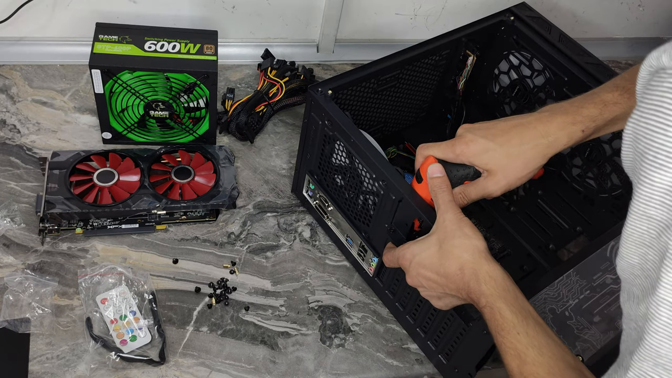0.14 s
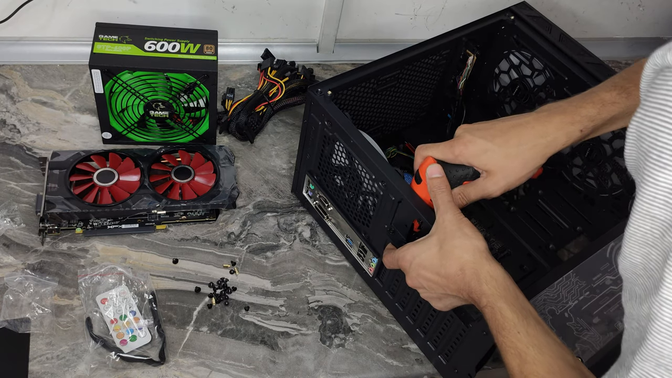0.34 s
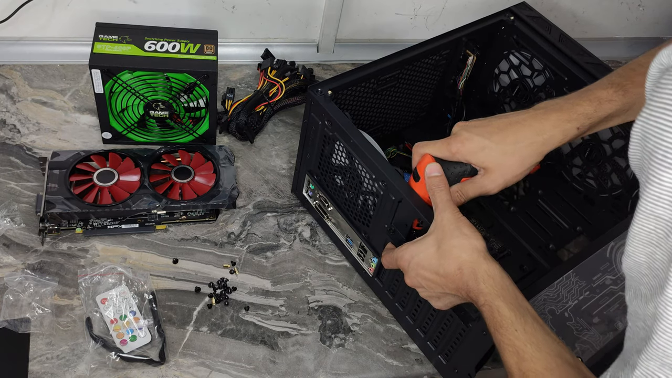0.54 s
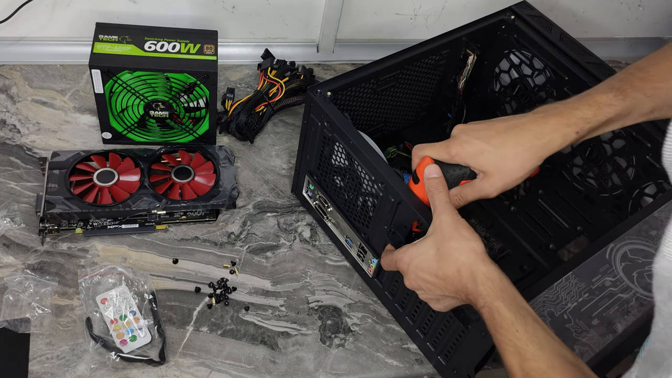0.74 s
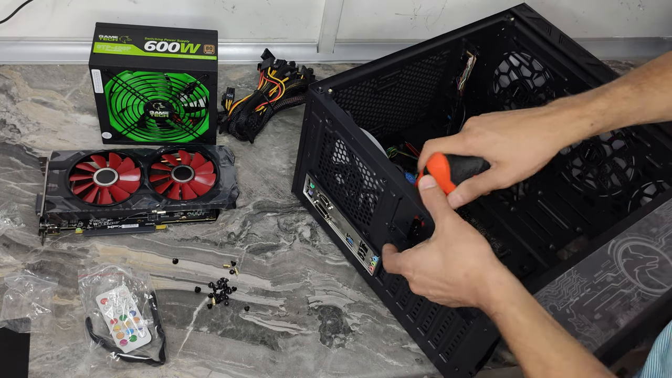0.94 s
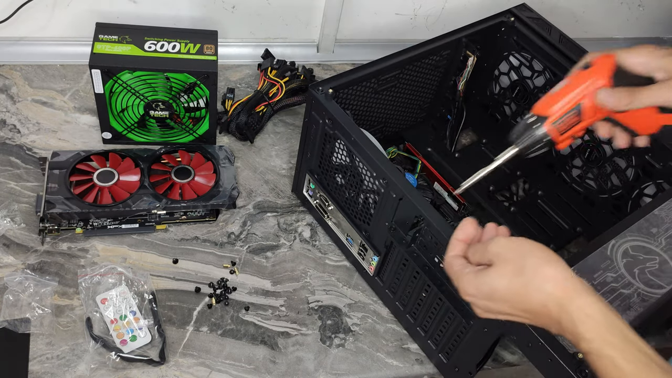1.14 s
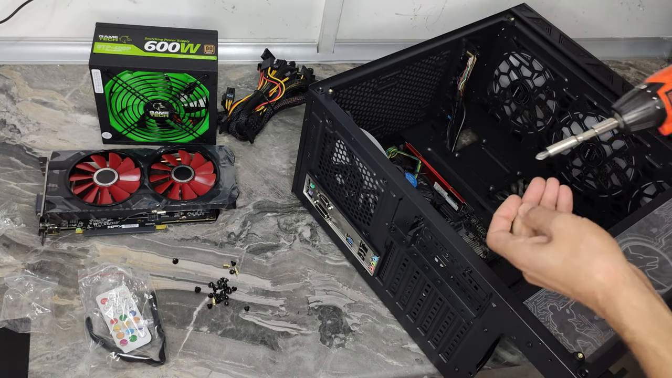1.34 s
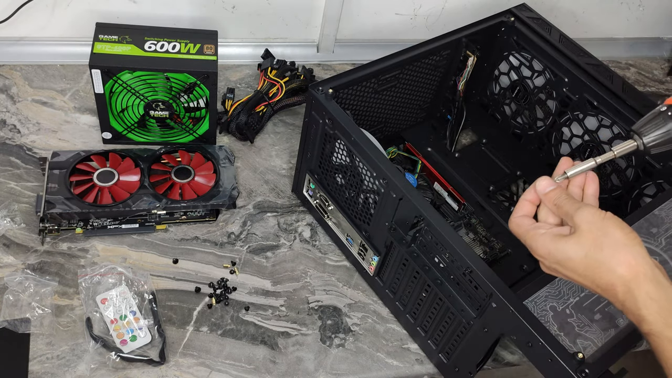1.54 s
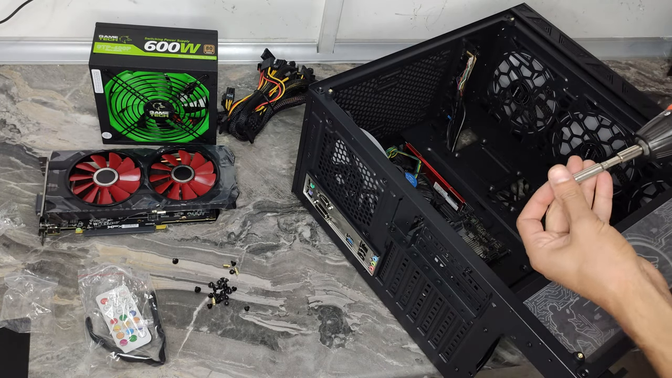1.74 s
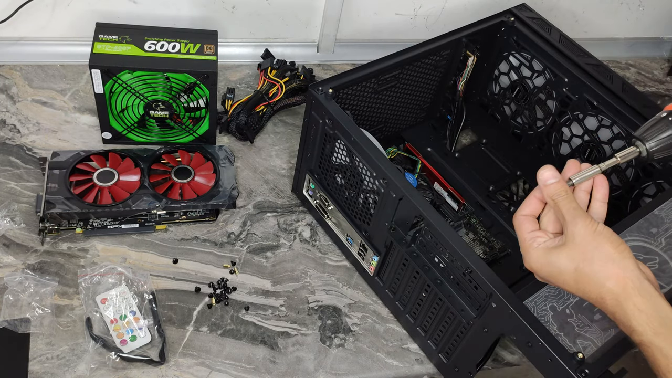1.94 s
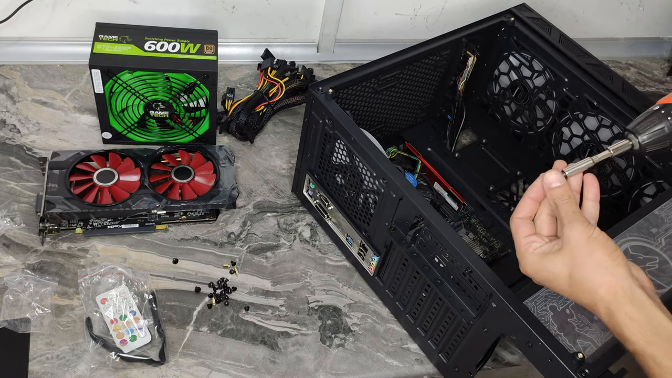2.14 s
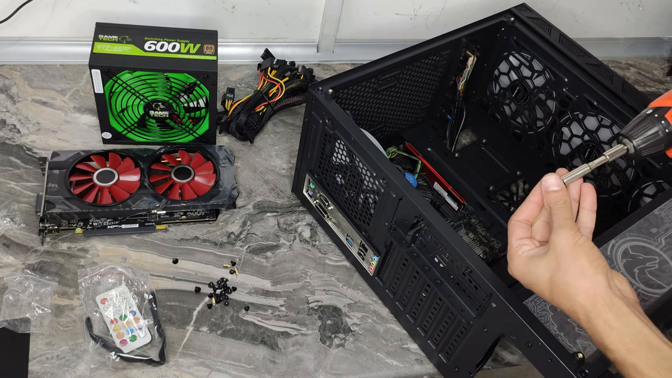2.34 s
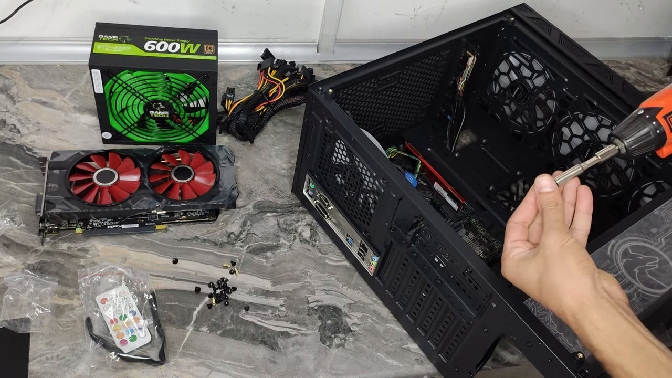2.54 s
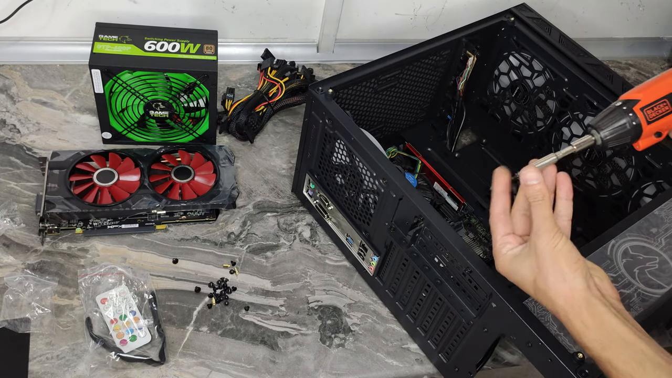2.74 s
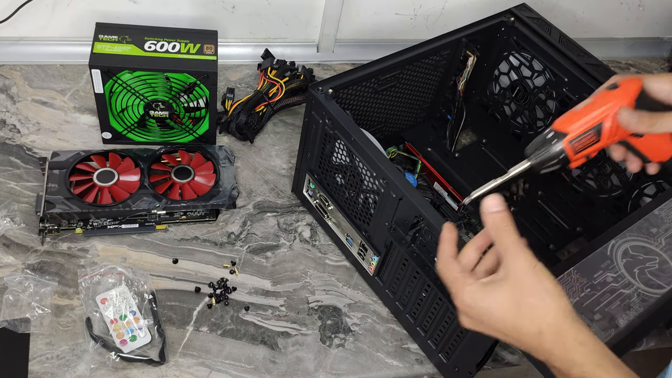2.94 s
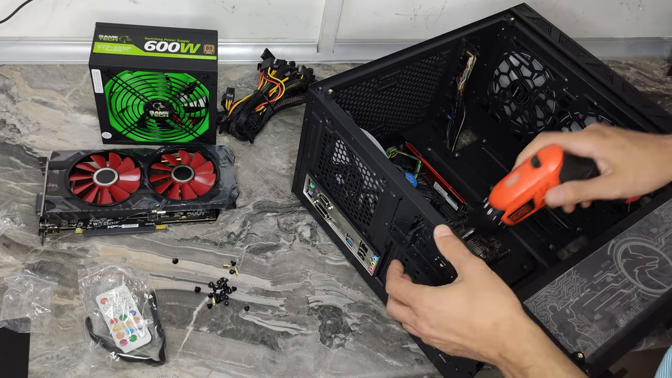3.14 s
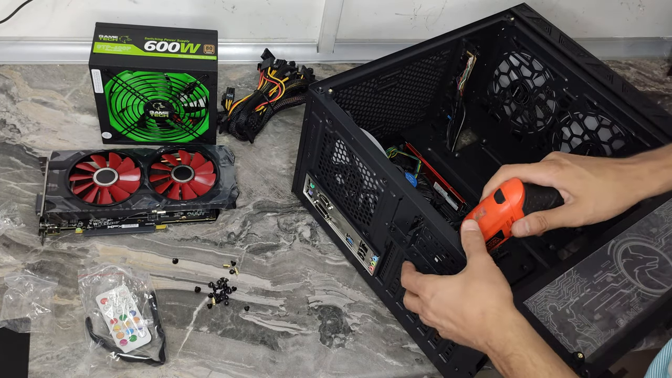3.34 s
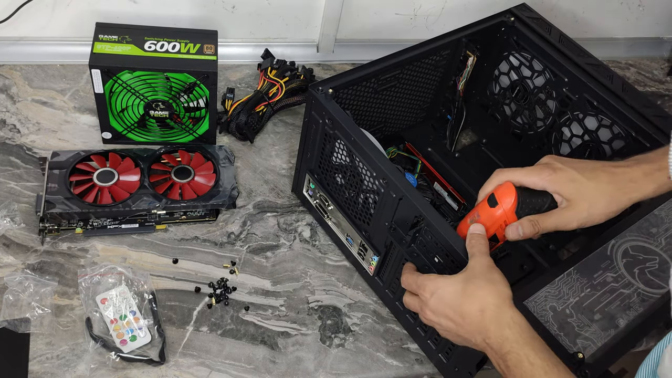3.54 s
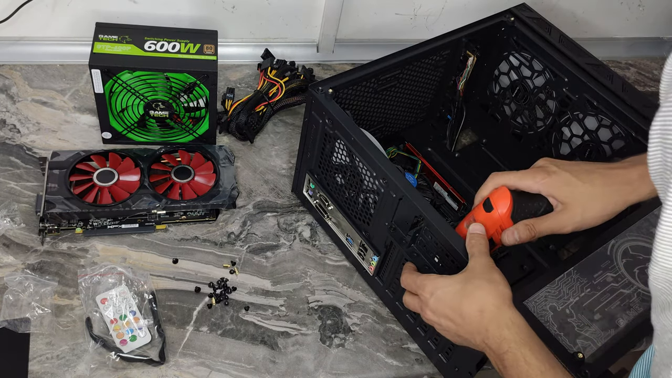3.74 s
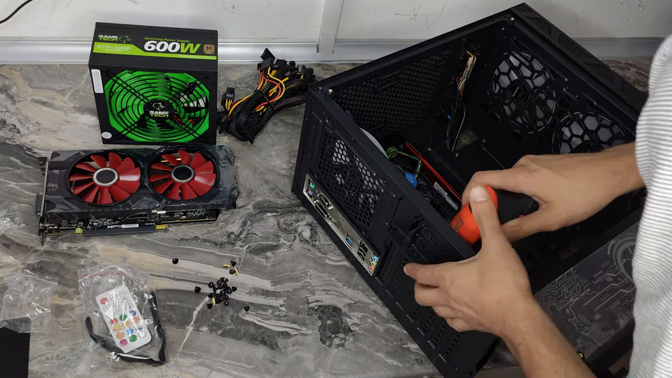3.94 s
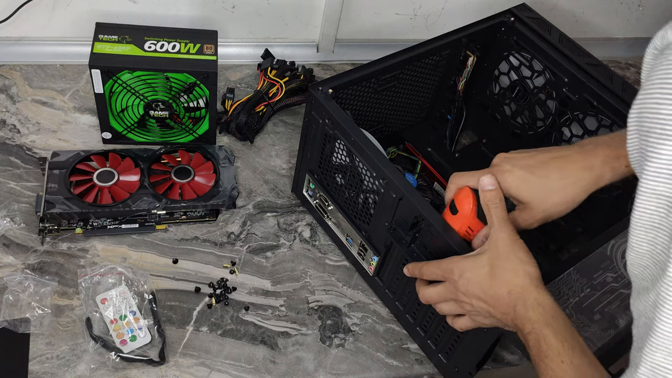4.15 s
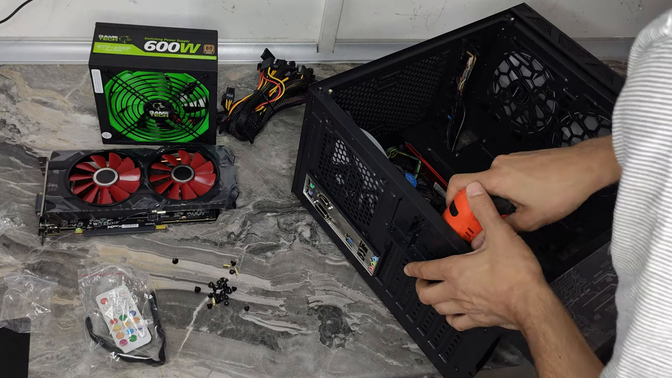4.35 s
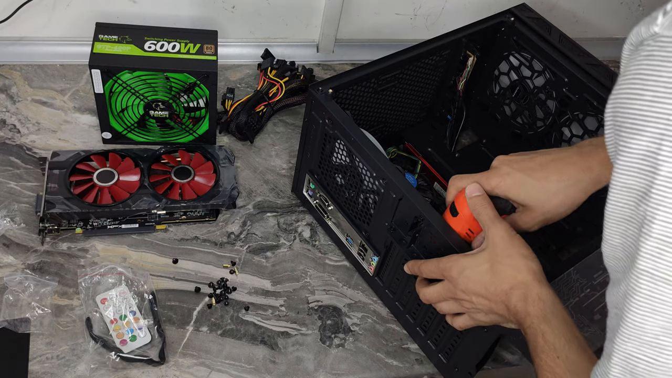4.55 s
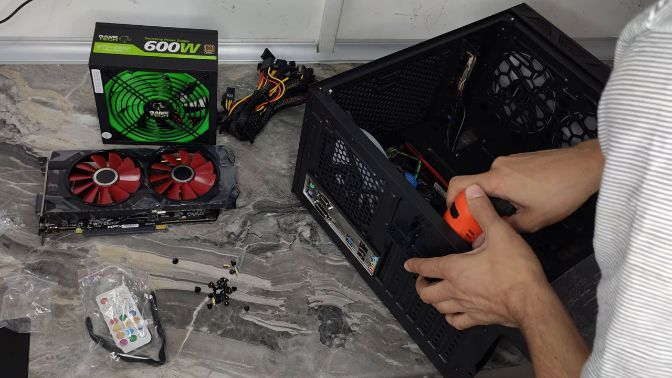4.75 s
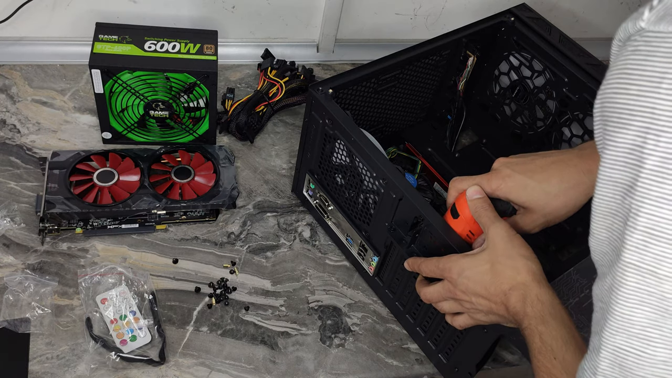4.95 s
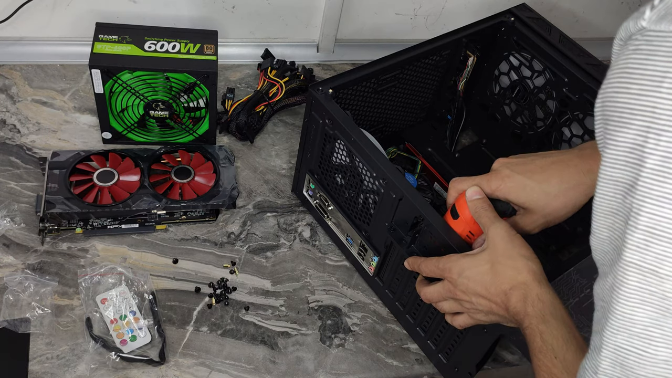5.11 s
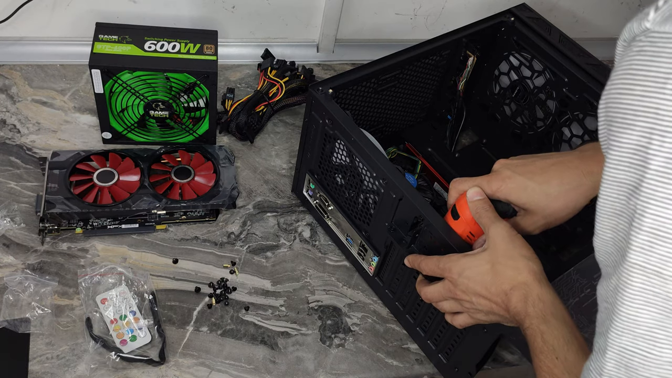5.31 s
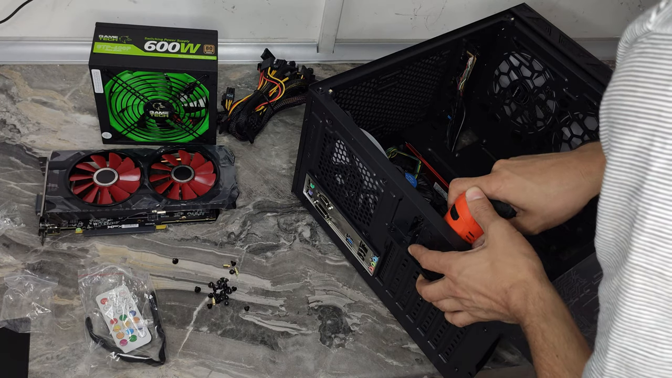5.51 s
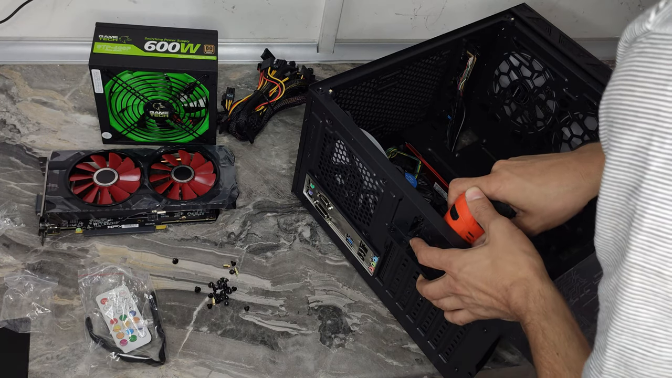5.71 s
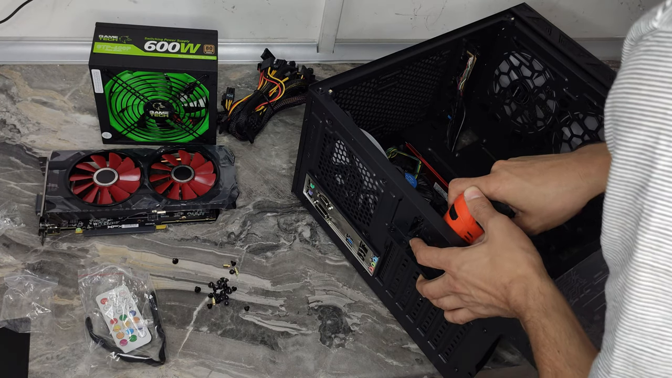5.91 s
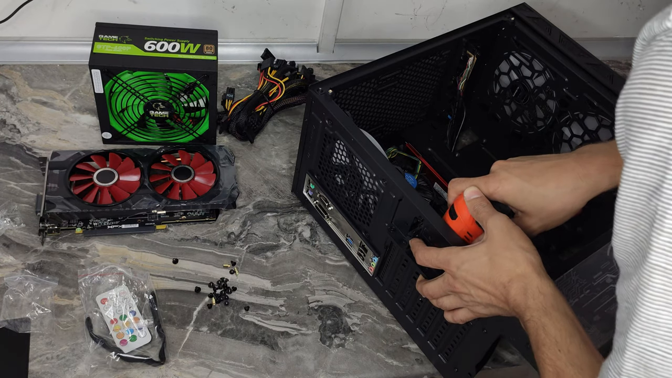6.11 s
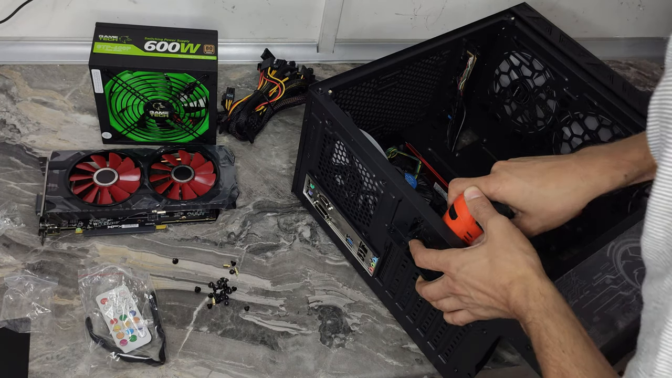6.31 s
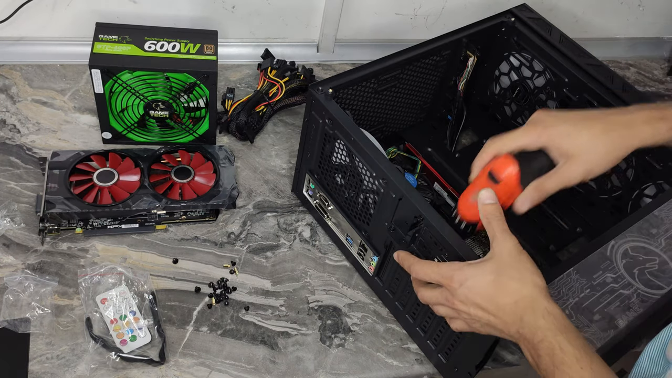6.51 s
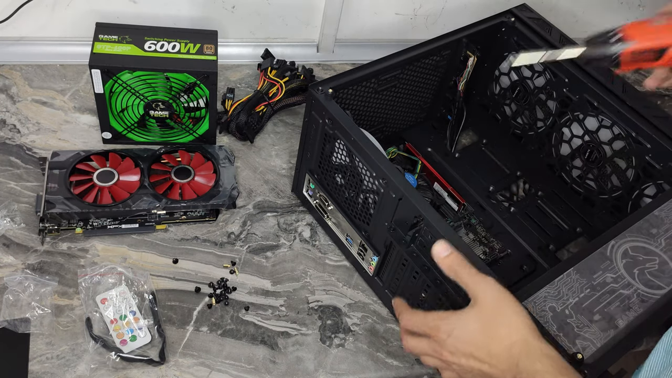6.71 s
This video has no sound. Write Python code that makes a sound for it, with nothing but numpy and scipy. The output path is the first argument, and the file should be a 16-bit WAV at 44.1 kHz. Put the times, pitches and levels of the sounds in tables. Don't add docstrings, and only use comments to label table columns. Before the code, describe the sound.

Close in a small hard room, a cordless driver whirs with a coarse gear rattle through thin sheet metal, groans and bangs as the first screw tightens, and coasts down. Tiny metallic ticks, a soft knuckle knock and rough scraping follow over faint rumble and hiss. A sharp clank starts the second, longer drive, which chatters loudly and stops with a thud.

```python
import sys
import numpy as np
from scipy import signal
from scipy.fft import rfft, irfft, next_fast_len
from scipy.io import wavfile
from scipy.ndimage import uniform_filter1d

SR = 44100
rng = np.random.default_rng(int(sys.argv[2]) if len(sys.argv) > 2 else 0)


def wav_record(signal):
    frames = np.transpose(np.atleast_2d(signal))
    bounded = np.clip(frames, -1, 1)
    quanta = np.round(bounded * 32767).astype(np.int16)
    wavfile.write(sys.argv[1], SR, quanta)


def boost(x):
    u = np.asarray(x, float) / 20
    return 10 ** u


N = 298557
SIZE = next_fast_len(N + SR)
HZ = np.maximum(np.fft.rfftfreq(SIZE, 1 / SR), 1)

# (time [s], effort as rattle level [dB], speed [share of free running])
MOTOR_RUNS = [
    [(0, -21, 1.01), (.3, -21, 1.0), (.42, -21, .99), (.5, -14, .92), (.59, -18, .76), (.7, -16.5, .9),
     (.88, -18, .95), (.96, -21, .95)],
    [(4.19, -24, 1.0), (4.31, -29.5, 1.04), (4.55, -26, 1.04), (4.85, -22, 1.0), (5.4, -21, .995),
     (5.92, -20, .99), (6.06, -16, .85), (6.2, -13.5, .92), (6.46, -20.5, .95)],
]
USUAL_EFFORT_DB, FULL_LOAD_SAG = -21, .17
SEATED_S = [0.52, 6.1]
# (fall [dB/s], turns on for [s])
COASTS = [(-71, .36), (-89, .35)]
STOP_DB_PER_S, RELEASE_S = -250, 0.077

# (frequency [Hz], density [dB per Hz])
RATTLE_COLOUR = [(59, -68.5), (100, -31.5), (205, -16.5), (370, -6.5), (420, -8.5), (565, -15), (668, -3),
                 (1060, -2.5), (1130, -6.5), (2420, -4.5), (2990, -3.5), (4660, -11), (7260, -14.5),
                 (14600, -31.5), (15500, -41)]
# (frequency [Hz], width [Hz], level [dB])
PANEL_MODES = [(459, 47, -1.5), (608, 150, -4), (1197, 48, -13), (1344, 100, -7.5), (1760, 15, -35),
               (2200, 11, -42), (2870, 37, -34), (3405, 69, -12), (4080, 120, -10), (4940, 63, -14),
               (5950, 52, -5), (6450, 52, -1), (6910, 710, -7.5), (8050, 85, -43)]
# (usual level [dB], effort followed [share], change on release [dB], slip shake [dB])
RATTLE_PATHS = [(-28, 0.88, 3, -6), (-21, 1.01, -4.5, -1), (-29, 1.07, -3, -6), (-34.5, 0.9, -11, -30)]
PATH_EDGES_HZ = (1200, 4600, 8500)
# (time [s], peak [dB])
SLIPS = [
    (0.603, -7),
    (0.718, -22),
    (0.7832, -0.5),
    (0.853, -4.5),
    (0.923, -1),
    (6.142, 0.5),
    (6.2145, -2.5),
    (6.2777, -2),
    (6.348, -5.5),
    (6.4173, -1.5),
]
SLIP_T60_S, SLIP_RISE_S, SLIP_TRIM_DB = 0.067, 0.0038, -11.5
SNAP_DB, SNAP_T60_S = -10, .03
CLIMB_DB, CLIMB_S = -3.5, .04

# (free-running frequency [Hz], usual level [dB], effort followed [share], change at full load [dB])
ROTOR = (215, -46.5, 1.0, -4)
IMBALANCE = (215, -52.5, 0, 17)
WHINE = (1362, -37, 1.5, -50)
MESH = (3060, -33.5, 1.2, -17)
# (multiple [ratio], level [dB])
ROTOR_ORDERS = [(2, 1.5), (3, 10.5), (4, 7)]
WHINE_ORDERS = [(5 / 6, -0.25), (1, 0), (10 / 6, -15.5)]
MESH_ORDERS = [(0.619, -8), (.935, -3), (1, -8), (1.107, -5.5)]
# (start [s], end [s], from [Hz], to [Hz], level [dB])
HIGH_GROANS = [
    (.44, .6, 1897, 1712, -24),
    (.61, .83, 1770, 1733, -28.5),
    (5.99, 6.18, 2200, 1348, -25),
    (6.22, 6.39, 2115, 2200, -25),
]
LOW_GROANS = [
    (.58, .82, 800, 892, -26),
    (5.96, 6.18, 853, 953, -27.5),
    (6.19, 6.42, 985, 846, -24.5),
]
GROAN_SWELL_DB = 3.5

# (time [s], peak [dB], shove [s], brightness [dB per octave])
THUDS = [(.604, -3.5, 0.0055, 3), (.629, -11.5, 0.0095, 0), (.718, -7, 0.0035, 1), (.744, -11.5, 0.0087, 8),
         (.989, -1.5, 0.0071, 0), (1.0, -7, 0.011, -1), (1.019, -6, 0.0065, 10),
         (1.045, -16, 0.0064, -10.5), (6.473, -6.5, 0.0094, -1), (6.487, -8.5, 0.0066, 2),
         (6.515, -11, 0.021, 8)]
TICKS = [(1.659, -53, 0.006, -3), (1.726, -37, 0.011, 0.5), (1.779, -46.5, 0.006, 5),
         (1.903, -38.5, 0.012, -4.5), (1.926, -49, 0.006, -4), (2.044, -50, 0.006, 4),
         (2.239, -37.5, 0.0091, 1), (2.271, -38, 0.015, 8), (2.29, -28.5, 0.011, -0.5),
         (2.319, -35, 0.011, 3), (2.351, -39, 0.0057, 1), (2.815, -33.5, 0.0083, -1.5),
         (2.839, -42, 0.0068, 3), (2.869, -44, 0.0065, -2)]
NUDGES = [
    (2.938, -40, 0.014, -4),
    (2.947, -35, 0.011, 7),
    (2.955, -34, 0.0061, 3),
]
GROPES = [
    (3.646, -27, 0.017, 6.5),
    (3.661, -20.5, 0.022, 0),
    (3.686, -29, 0.026, 3.5),
    (3.726, -22, 0.017, 4),
    (3.747, -22.5, 0.037, 3.5),
    (3.759, -29.5, 0.075, -2),
    (3.802, -25.5, 0.053, 3),
    (3.831, -25.5, 0.015, 5),
    (3.849, -34.5, 0.044, -4),
]
BITES = [
    (4.112, -34, 0.034, -1),
    (4.140, -19.5, 0.022, 3),
    (4.150, -11, 0.011, -2),
    (4.166, -4, 0.0061, 1),
    (4.173, -4, 0.017, -1),
    (4.183, -19, 0.0036, -5),
    (4.205, -16, 0.0072, -5),
]
SHOVE_RISE = 0.24
# (frequency [Hz], width [Hz], level [dB])
CASE_MODES = [(150, 53, -6), (247, 90, -4), (364, 45, -1), (380, 117, 2), (486, 166, -3), (718, 134, -3.5),
              (810, 90, 1), (908, 72, -13)]
BIT_MODES = [(1230, 190, -23), (1415, 67, 8), (2010, 190, -31)]
HOLLOW_MODES = [(327, 64, 2), (500, 91, 3.5), (630, 90, -6)]
GROPED_PANEL_MODES = [(393, 110, 2.5), (517, 80, -2), (730, 130, -2.5), (1424, 110, 1.5), (3070, 340, -21)]
CLANK_MODES = [(872, 30, 16), (920, 37, 6), (1020, 56, 9), (1270, 60, -9), (1360, 32, 8), (1450, 58, 8),
               (3300, 83, -14)]
# (frequency [Hz], density [dB per Hz])
THUD_COLOUR = [(60, -23.5), (110, -21), (278, 0), (411, 5), (647, -7), (786, -6), (1130, -9), (1600, -16.5),
               (2000, -26), (2600, -31), (4400, -120)]
TICK_COLOUR = [(350, -35), (600, -9), (1370, 1), (2020, -7), (2570, -10.5), (3340, -14), (6330, -19),
               (8030, -31), (12000, -39), (15600, -69), (22000, -120)]
GROPE_COLOUR = [(47, -52), (80, -13), (237, -12.5), (278, -19), (381, -2), (600, -15), (808, -0.5),
                (965, -29), (1380, -30), (1970, -16), (3290, -24.5), (9000, -43), (11700, -65),
                (19800, -120)]
BITE_COLOUR = [(35, -29), (60, -37.5), (423, -8.5), (521, -9), (849, -5), (931, -12), (1020, 0.5),
               (1290, -8), (1380, -5), (1670, -5.5), (8280, -19.5), (15500, -61)]

# (frequency [Hz], density [dB per Hz])
AIR_COLOUR = [(29, -37), (50, -6), (158, -19.5), (183, -8.5), (350, -8.5), (394, -7), (501, -9.5),
              (539, -9), (958, -10.5), (1280, -17), (2020, -18.5), (3110, -22.5), (15500, -36)]
AIR_DB, DRONE_HZ, DRONE_DB = -49, 32.8, -58
# (frequency [Hz], likeness [share])
LIKENESS = [(30, .97), (130, .92), (300, .8), (600, .6), (1200, .3), (2500, .3), (5000, .08), (12000, .02)]
# (frequency [Hz], T60 [s])
ROOM_T60 = [(100, 0.56), (500, 0.34), (2000, 0.41), (8000, 0.12)]
CUTOFF_HZ = 16900


def rms_one(x):
    return x / np.sqrt(np.mean(x ** 2) + 1e-20)


def at_hz(points, hz):
    table = np.array(points)
    return np.interp(np.log(hz), np.log(table[:, 0]), table[:, 1])


def shaped(x, gain):
    return irfft(rfft(x, SIZE) * gain, SIZE)[..., :N]


def drift(rate_hz):
    size = next_fast_len(N // 16 + 2)
    hz = np.fft.rfftfreq(size, 16 / SR)
    slow = irfft(rfft(rng.standard_normal(size)) / (1 + (hz / rate_hz) ** 2), size)
    return np.interp(np.arange(N) / 16, np.arange(size), rms_one(slow))


def resonate(x, hz, width_hz):
    r = np.exp(-np.pi * width_hz / SR)
    poles = [1, -2 * r * np.cos(2 * np.pi * hz / SR), r * r]
    return signal.lfilter([(1 - r * r) / 2, 0, (r * r - 1) / 2], poles, x)


def in_time(spans, k, silent=None):
    t = np.arange(N) / SR
    rows = np.concatenate(spans)
    out = np.interp(t, rows[:, 0], rows[:, k])
    if silent is not None:
        inside = sum((t >= span[0][0] - .002) & (t <= span[-1][0] + .002) for span in spans)
        out = uniform_filter1d(np.where(inside, out, silent), size=600)
    return out


def two_ears(mid, side):
    alike = at_hz(LIKENESS, HZ)
    mid = shaped(mid, np.sqrt((1 + alike) / 2))
    side = shaped(side, np.sqrt((1 - alike) / 2))
    return np.array([mid + side, mid - side])


def room(x, wet_db):
    t = np.arange(SR) / SR
    white = rng.standard_normal((2, SR))
    tail = 0
    for low_hz in 45 * 2 ** np.arange(8.5):
        octave = signal.butter(2, [low_hz, min(2 * low_hz, 19000)], "band", fs=SR, output="sos")
        band = signal.sosfilt(octave, white)
        dying = boost(-60 * t / at_hz(ROOM_T60, 0.88 * low_hz)) * np.clip(t / 0.0025, 0, 1)
        tail = tail + band * dying / np.sqrt(np.sum(dying ** 2))
    return x + boost(wet_db) * shaped(x.mean(axis=0), rfft(two_ears(*tail), SIZE))


def air():
    hum = shaped(two_ears(*rng.standard_normal((2, N))), boost(at_hz(AIR_COLOUR, HZ)))
    phase = 2 * np.pi * DRONE_HZ * np.arange(N) / SR + 0.67 * drift(1.2)
    drone = np.sqrt(2) * boost(DRONE_DB + 1.1 * drift(2.4)) * np.sin(phase)
    return boost(AIR_DB + .3 * drift(3)) * rms_one(hum) + drone


def motor_state():
    t = np.arange(N) / SR
    run = (t >= MOTOR_RUNS[1][0][0] - .01).astype(int)
    since_release = t - np.array([rows[-1][0] for rows in MOTOR_RUNS])[run]
    fall, turning = np.array(COASTS)[run].T
    coast_db = fall * np.maximum(since_release, 0)
    coast_db += STOP_DB_PER_S * np.maximum(since_release - turning, 0)
    coast_db = uniform_filter1d(np.maximum(coast_db, -100), size=600)
    released = np.clip(since_release / RELEASE_S, 0, 1)
    biting = uniform_filter1d((t < np.array(SEATED_S)[run]) * 1., size=600)
    return in_time(MOTOR_RUNS, 1) - USUAL_EFFORT_DB, in_time(MOTOR_RUNS, 2), coast_db, released, biting


def patchy(x, depth_db):
    _, _, cells = signal.stft(x, nperseg=1024)
    field = rng.standard_normal(cells.shape[-2:])
    field = uniform_filter1d(field, size=3, axis=0)
    field = uniform_filter1d(field, size=7, axis=1)
    return signal.istft(cells * boost(depth_db * rms_one(field)), nperseg=1024)[1][:, :N]


def tooth_contacts(speed):
    turn = np.cumsum(ROTOR[0] * speed) / SR
    strength = boost(2.0 * np.minimum(rng.exponential(1, N), 5))
    teeth = strength * rng.standard_normal((2, N))
    teeth *= 1 + 0.04 * np.cos(2 * np.pi * turn)
    teeth *= boost(0.81 * drift(18) + 0.82 * drift(18))
    teeth = patchy(rms_one(teeth), depth_db=2.5)
    ringing = sum(boost(db) * resonate(teeth, hz, width) for hz, width, db in PANEL_MODES)
    return teeth + boost(4.0) * ringing


def bit_slips():
    t = np.arange(N) / SR
    shake, lull_db = np.zeros(N), np.zeros(N)
    for s, db in SLIPS:
        away = np.abs(t - s)
        lull_db += CLIMB_DB * np.exp(-away / CLIMB_S) * (t < s)
        body = boost(db + SLIP_TRIM_DB - 60 * away / SLIP_T60_S)
        snap = boost(db + SNAP_DB - 60 * away / SNAP_T60_S)
        shake += (body + snap) * np.clip((t - s) / SLIP_RISE_S, 0, 1)
    return shake, lull_db


def gear_rattle(state):
    effort_db, speed, coast_db, released, _ = state
    spectrum = rfft(tooth_contacts(speed), SIZE) * boost(at_hz(RATTLE_COLOUR, HZ))
    shake, lull_db = bit_slips()
    below = [0] + [1 / (1 + (HZ / edge) ** 6) for edge in PATH_EDGES_HZ] + [1]
    out = 0
    for k, (usual_db, follows, release_db, slip_db) in enumerate(RATTLE_PATHS):
        path = rms_one(irfft(spectrum * (below[k + 1] - below[k]), SIZE)[:, :N])
        level_db = usual_db + follows * effort_db + release_db * released + coast_db + lull_db
        out = out + path * np.hypot(boost(level_db), shake * boost(slip_db))
    return out


def tones(hz, level, orders, wander, wander_hz, flutter_db):
    phase = 2 * np.pi * np.cumsum(hz * (1 + wander * drift(wander_hz))) / SR
    out = 0
    for k, db in orders:
        out = out + np.sqrt(2) * level * boost(db + flutter_db * drift(wander_hz / 2)) * np.sin(k * phase)
    return out


def steady(part, state):
    free_hz, usual_db, follows, load_db = part
    effort_db, speed, _, _, biting = state
    load = np.clip((1 - speed) / FULL_LOAD_SAG, 0, 1)
    return free_hz * speed, biting * boost(usual_db + follows * effort_db + load_db * load)


def rotor_tones(state):
    out = tones(*steady(ROTOR, state), ROTOR_ORDERS, wander=.005, wander_hz=10, flutter_db=2.0)
    out += tones(*steady(IMBALANCE, state), [(1, 0)], wander=.01, wander_hz=10, flutter_db=3.0)
    out += tones(*steady(WHINE, state), WHINE_ORDERS, wander=.002, wander_hz=10, flutter_db=3.0)
    out += tones(*steady(MESH, state), MESH_ORDERS, wander=.003, wander_hz=14, flutter_db=3.5)
    return out


def glides(rows):
    spans = []
    for start, end, from_hz, to_hz, db in rows:
        middle = ((start + end) / 2, (from_hz + to_hz) / 2, db)
        spans.append([(start, from_hz, db - GROAN_SWELL_DB), middle, (end, to_hz, db - GROAN_SWELL_DB)])
    return in_time(spans, 1), boost(in_time(spans, 2, silent=-120))


def gear_groans():
    high = tones(*glides(HIGH_GROANS), [(1, 0)], wander=.05, wander_hz=80, flutter_db=4.0)
    low = tones(*glides(LOW_GROANS), [(1, 0)], wander=.12, wander_hz=130, flutter_db=3.0)
    return high + low


def causal(gain_db):
    cepstrum = irfft(gain_db * np.log(10) / 20)
    half = len(cepstrum) // 2
    cepstrum[1:half] *= 2
    cepstrum[half + 1:] = 0
    return np.exp(rfft(cepstrum))


def blows(events, modes, colour, crack_db, spread_db, trim_db, hard):
    out, t = np.zeros((2, N)), np.arange(12000) / SR
    hz_grid = np.maximum(np.fft.rfftfreq(len(t), 1 / SR), 10)
    radiated = signal.butter(2, [75, 4500], "band", fs=SR, output="sos")
    for s, db, shove_s, tilt_db in events:
        strengths = rng.standard_normal(len(modes))
        shove = rng.standard_normal((2, len(t))) * np.exp(-t / shove_s) + 1e-18
        shove *= np.clip(t / (SHOVE_RISE * shove_s), 0, 1)
        shove[:, 0] += hard * np.sqrt(np.sum(shove ** 2, axis=1))
        ring = 0
        for k, (hz, width, level_db) in enumerate(modes):
            mode_db = level_db + spread_db * strengths[k] + tilt_db * np.log2(hz / 1000)
            ring = ring + (-1) ** k * boost(mode_db) * resonate(shove, hz, width)
        ring = signal.sosfilt(radiated, ring)
        crack_gain_db = at_hz(colour, hz_grid) + tilt_db * np.log2(hz_grid / 1000)
        crack = irfft(rfft(shove) * causal(crack_gain_db))
        sound = rms_one(ring) + boost(crack_db) * rms_one(crack) * (t < .2)
        sound *= 1
        peak = np.abs(sound).max(axis=1, keepdims=True)
        at = round(s * SR)
        out[:, at:at + len(t)] += (boost(db + trim_db) * sound / peak)[:, :N - at]
    return out


def case_thuds():
    return blows(THUDS, CASE_MODES, THUD_COLOUR, crack_db=3.5, spread_db=0.5, trim_db=2.4, hard=0.57)


def screw_ticks():
    return blows(TICKS, BIT_MODES, TICK_COLOUR, crack_db=5, spread_db=-2.0, trim_db=6.5, hard=0.65)


def knuckle_nudge():
    return blows(NUDGES, HOLLOW_MODES, THUD_COLOUR, crack_db=-16, spread_db=1.0, trim_db=1.0, hard=.8)


def screw_gropes():
    return blows(GROPES, GROPED_PANEL_MODES, GROPE_COLOUR, crack_db=-3.5, spread_db=4.5, trim_db=1.0, hard=0.37)


def bit_bites():
    return blows(BITES, CLANK_MODES, BITE_COLOUR, crack_db=3.5, spread_db=3, trim_db=4.5, hard=0.27)


def scene():
    state = motor_state()
    motor = two_ears(*gear_rattle(state)) + rotor_tones(state) + gear_groans()
    knocks = case_thuds() + screw_ticks() + knuckle_nudge() + screw_gropes() + bit_bites()
    knocks = signal.sosfilt(signal.butter(2, 55, "high", fs=SR, output="sos"), knocks)
    return room(motor, wet_db=-2.0) + room(two_ears(*knocks), wet_db=3.5) + air()


def top_cut(x):
    return signal.sosfilt(signal.butter(12, 15670, fs=SR, output="sos"), x)


def record(dry):
    cut = signal.sosfilt(signal.cheby2(12, 70, CUTOFF_HZ, fs=SR, output="sos"), dry)
    mix = np.clip(cut, -1, 1)
    return top_cut(mix)


dry = scene()
out = record(dry)
wav_record(out)
```